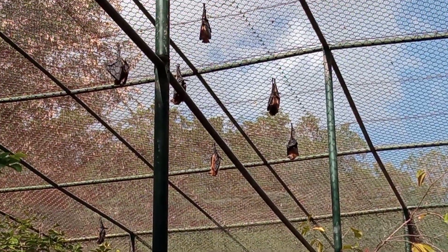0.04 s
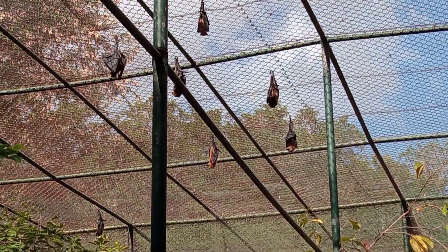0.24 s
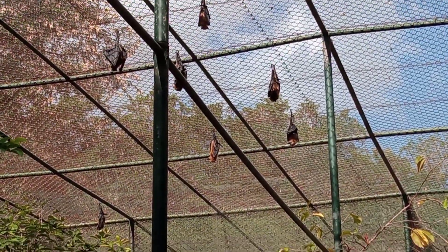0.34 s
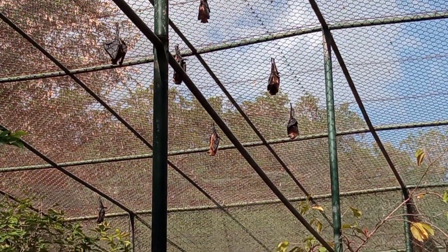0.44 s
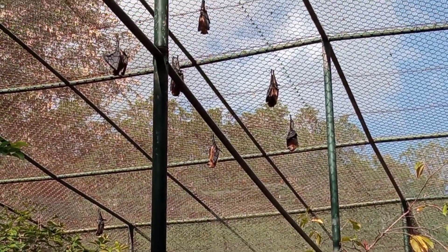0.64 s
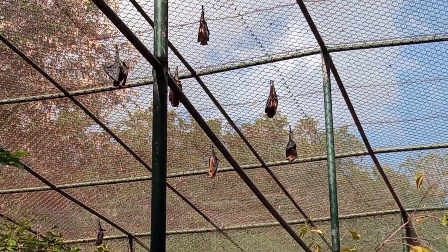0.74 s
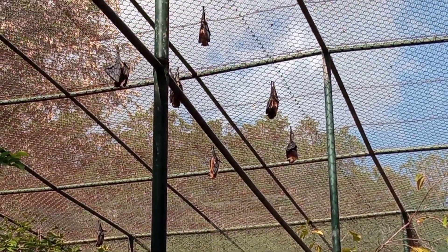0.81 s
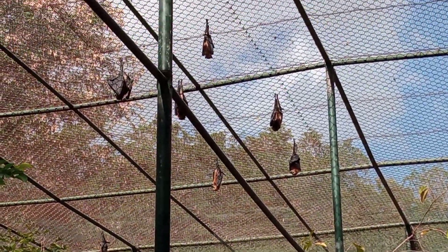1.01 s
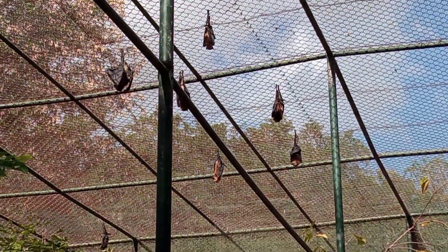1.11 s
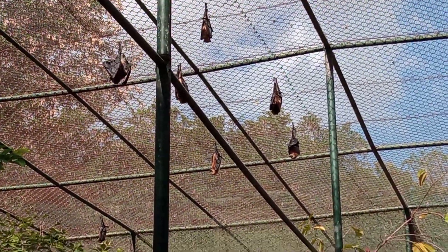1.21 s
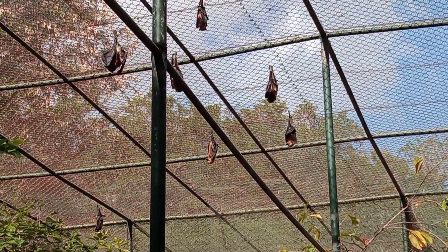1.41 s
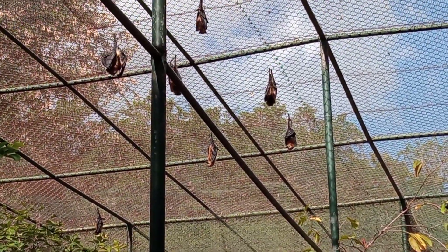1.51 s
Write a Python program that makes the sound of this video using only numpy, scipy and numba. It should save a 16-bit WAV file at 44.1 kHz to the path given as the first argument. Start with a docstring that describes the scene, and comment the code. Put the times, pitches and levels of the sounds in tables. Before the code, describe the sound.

A fruit bat gives one harsh, raspy screech close by, which echoes away in an outdoor enclosure. Another bat squawks softly farther off, while light wind buffets the microphone over a quiet hush.

```python
"""A netted outdoor enclosure, light wind buffeting the microphone over a soft hush with faint low tones.
Close by, a fruit bat screeches once: irregular throat pulses and rasp ring a strong resonance.
Farther off, another bat squawks and thin animal calls glide; the enclosure echoes every call.
One tiny tick sounds near the microphone."""
import sys
import numpy as np
from scipy import signal
from scipy.fft import rfft, irfft, next_fast_len
from scipy.io import wavfile
from scipy.ndimage import uniform_filter1d
from numba import njit

SR = 44100
rng = np.random.default_rng(int(sys.argv[2]) if len(sys.argv) > 2 else 0)


def transcribe(u):
    """Save the signal u as a 16-bit wav file named by the first command-line argument.

    u: samples, shape (n,) or (channels, n), limited to [-1, 1]; the rate is SR.
    q: integer samples, one column per channel.
    """
    v = np.clip(np.atleast_2d(u).T, -1, 1)
    q = np.round(v * 32767).astype(np.int16)
    wavfile.write(sys.argv[1], SR, q)


N = 68355
T = np.arange(N) / SR


def undb(db):
    """Decibels to gain."""
    return 10 ** (np.asarray(db) / 20)


def unit(x):
    """Scale to rms 1."""
    return x / np.sqrt(np.mean(x ** 2))


def colour(x, points):
    """Causal filter through (Hz, dB) points."""
    hz, db = np.array(points).T
    size = 2 * next_fast_len(N)
    f = np.maximum(np.arange(size // 2 + 1) * SR / size, 1)
    cepstrum = irfft(np.log(undb(np.interp(np.log(f), np.log(hz), db))))
    cepstrum[1:size // 2] *= 2
    cepstrum[size // 2 + 1:] = 0
    return irfft(rfft(x, size) * np.exp(rfft(cepstrum)))[:N]


@njit
def resonate(x, hz, width_hz):
    """Band-pass with a moving centre."""
    y, band, low = np.empty(len(x)), 0., 0.
    for i in range(len(x)):
        g, damping = np.tan(np.pi * hz[i] / SR), width_hz / hz[i]
        v = (band + g * (x[i] + 1e-18 - low)) / (1 + g * (g + damping))
        band, low, y[i] = 2 * v - band, low + 2 * g * v, damping * v
    return y


def formant(x, hz, width_hz):
    """A steep resonance: the band-pass twice."""
    hz = hz * np.ones(N)
    return resonate(resonate(x, hz, float(width_hz)), hz, float(width_hz))


def walk(rate_hz):
    """Smooth random drift with rms 1."""
    return unit(np.interp(T * rate_hz, np.arange(N), rng.standard_normal(N)))


def controls(table):
    """A call's gain (silent outside it) and its other columns, per sample."""
    times, db, *columns = np.array(table).T
    gain = undb(np.interp(T, times, db, left=-150, right=-150))
    return [gain] + [np.interp(T, times, column) for column in columns]


# The open air all around. Each row: frequency in Hz, relative level in dB.
HUSH_SPECTRUM = [(30, -0.5), (120, 0), (260, 2.5), (480, 3.5), (620, 3), (800, -4.5), (1100, -10.5),
                 (1600, -6), (2500, -5), (4200, -7), (6000, -18), (7800, -29), (10000, -22), (12000, -48),
                 (16000, -50)]

def hush():
    """Soft outdoor background, almost steady."""
    return undb(-64.5 + .27 * walk(6.46)) * unit(colour(rng.standard_normal(N), HUSH_SPECTRUM))


# Buffets right on the microphone. Each row: peak time in seconds, half-width in seconds, level in dB.
WIND_BUFFETS = [(0.042, .025, -56), (0.252, 0.031, -54.5), (0.345, 0.0074, -58), (0.422, 0.0092, -46),
                (0.505, 0.075, -55), (0.694, 0.024, -55), (0.751, 0.014, -44.5), (0.807, .012, -49),
                (0.868, .03, -49), (1.085, 0.028, -45.5), (1.141, 0.0076, -49), (1.16, 0.01, -39.5),
                (1.252, 0.036, -50.5), (1.325, 0.012, -44.5), (1.43, 0.045, -55.5), (1.484, 0.022, -54.5),
                (1.522, 0.016, -46)]
# The wind's rumble, then its small eddies. Each row: frequency in Hz, relative level in dB.
RUMBLE_SPECTRUM = [(20, -41), (45, -26.5), (70, -7), (110, -2.5), (155, -10), (220, -23), (400, -35.5),
                   (900, -61.5), (4000, -100)]
EDDY_SPECTRUM = [(60, -25), (170, 1), (260, -4.5), (400, -19.5), (900, -48), (4000, -90)]

def wind(breeze_db=-58.5, eddy_db=-9):
    """A low flutter on the microphone swells with each buffet; only buffets stir up the small eddies."""
    gust_power = sum(undb(db) ** 2 * np.exp(-((T - at) / width) ** 2) for at, width, db in WIND_BUFFETS)
    rumble = signal.hilbert(colour(rng.standard_normal(N), RUMBLE_SPECTRUM))
    even_rumble = unit(rumble.real / np.sqrt(uniform_filter1d(abs(rumble) ** 2, size=900)))
    eddies = undb(eddy_db) * unit(colour(rng.standard_normal(N), EDDY_SPECTRUM))
    return np.sqrt(undb(breeze_db) ** 2 + gust_power) * even_rumble + np.sqrt(gust_power) * eddies


# The enclosure's tail. Each row: band centre in Hz, seconds to fade by 60 dB, relative level in dB.
TAIL_BANDS = [(676, 1, 10.5), (1434, 0.79, 3), (2190, 1, 2.5), (2354, 0.9, -2.5), (2600, 0.73, 1),
              (3430, 0.95, 6), (4700, 0.66, -3), (6100, 0.77, 1), (8600, 0.62, 4)]

def enclosure_echoes(calls, first_echo_s=.0055, early_t60_s=.12, early_db=-5.5, tail_db=-6):
    """Quick scatter from the frame and ground, then a longer tail that dulls as it fades."""
    age = np.maximum(T - first_echo_s, 0)
    fade = lambda t60: unit(undb(-60 * age / t60) * (age > 0)) / np.sqrt(N)
    scatter = unit(rng.standard_normal(N) * (rng.random(N) < .02))
    response = undb(early_db) * fade(early_t60_s) * scatter
    spectrum, f = rfft(rng.standard_normal(N)), np.arange(N // 2 + 1) * SR / N
    centres = [row[0] for row in TAIL_BANDS]
    for (_, t60, db), band in zip(TAIL_BANDS, np.eye(len(TAIL_BANDS))):
        response += undb(tail_db + db) * fade(t60) * irfft(spectrum * np.interp(f, centres, band), N)
    return signal.fftconvolve(calls, response)[:N]


# High calls far from the microphone, and two faint low tones in the hush. Each row: start in seconds,
# length in seconds, first, middle and last pitch in Hz, relative level in dB, roughness from 0 to 1.
BACKGROUND_GLIDES = [(-.01, .06, 3560, 3660, 3680, -55, .04), (-.02, .22, 4400, 4250, 3600, -55, 1),
                     (-.02, .17, 5400, 5700, 5500, -64, 1), (.027, .012, 7000, 6400, 5900, -63, .3),
                     (.12, .1, 3550, 3100, 2600, -68, .3), (1.18, .09, 6300, 5900, 5300, -71, .25),
                     (1.39, .15, 4400, 3100, 2800, -69, .6), (.81, .22, 610, 565, 630, -69, .1),
                     (1.225, .10, 4700, 4100, 3400, -66, .12), (1.34, .075, 5850, 5000, 4200, -66, .14),
                     (1.32, .07, 2700, 2450, 2300, -67, .12), (1.22, .19, 790, 800, 780, -72, .08)]

def background_glides(flutter_depth=.1, flutter_hz=1100):
    """Thin high calls and faint low tones glide; their pitch flutters when they are rough."""
    tones = np.zeros(N)
    for start, length, first_hz, middle_hz, last_hz, db, rough in BACKGROUND_GLIDES:
        progress = np.clip((T - start) / length, 0, 1)
        glide_hz = np.interp(progress, [0, .5, 1], [first_hz, middle_hz, last_hz])
        hz = glide_hz * (1 + rough * flutter_depth * walk(flutter_hz))
        swell = np.sqrt(abs(np.sin(np.pi * progress)))
        tones += undb(db) * swell * np.sin(2 * np.pi * np.cumsum(hz) / SR)
    return tones


def tick(start_s=.9466, decay_s=.0002):
    """One tiny bright tick close to the microphone."""
    snap = (T >= start_s) * np.exp(-abs(T - start_s) / decay_s) * rng.standard_normal(N)
    return undb(-34) * formant(snap, hz=10800, width_hz=4800)


def larynx(rate_hz, jitter=.2, shimmer_db=1., rasp_share=.62, puff_decay_cycles=.6):
    """A bat's chaotic closures vary in period and strength; each lets out a fading puff of noise."""
    stretch, strength = rng.standard_normal((1000, 2)).T
    closures = np.append(0, np.cumsum(np.exp(jitter * stretch)))
    cycles = np.interp(np.cumsum(rate_hz * np.ones(N)) / SR, closures, np.arange(len(closures)))
    count = cycles.astype(int)
    clicks = unit(np.diff(count, prepend=0) * 1.)
    puffs = unit(np.exp(-(cycles % 1) / puff_decay_cycles) * rng.standard_normal(N))
    pulses = np.sqrt(1 - rasp_share) * clicks + np.sqrt(rasp_share) * puffs
    return pulses * undb(shimmer_db * np.tanh(strength[count]))


# A bat farther off. Each row: time in seconds, relative level in dB, main resonance in Hz.
FAR_SQUAWK = [(.88, -73, 2045), (.95, -63.5, 1952), (1.02, -61.5, 1707), (1.10, -59, 1710),
              (1.16, -66.5, 1840), (1.21, -85, 1670)]
# Its throat. Each row: frequency in Hz, relative gain in dB.
FAR_THROAT = [(1000, -31), (1500, 12.5), (2100, 9.5), (2900, -4.5), (4200, -2), (5300, -8), (6500, -7),
              (7900, -19), (9900, -17), (12000, -56)]

def far_bat():
    """A lower, softer squawk: pulses ring the throat and one moving resonance."""
    gain, hz = controls(FAR_SQUAWK)
    pulses = larynx(rate_hz=210)
    ring = unit(formant(pulses, hz, width_hz=600))
    throat = undb(10) * unit(colour(pulses, FAR_THROAT))
    return gain * (ring + throat)


# The bat close to the microphone. Each row: time in seconds, level in dB, relative level of the
# other throat resonances in dB, main resonance in Hz, pulses per second, roughness from 0 to 1.
NEAR_SCREECH = [(.225, -46, -12, 2400, 204, 0.21), (.229, -58.5, -2, 2433, 203, 0.1),
                (.231, -39.5, -2.5, 2400, 204.5, 0.21), (.25, -35.5, -6, 2530, 205.4, 0.77),
                (.284, -35, 0.5, 2343, 242, 0.67), (.32, -36.5, 2, 2570, 300, 0.65),
                (.345, -32, -3.5, 2502, 230, 0.76), (.40, -32.5, -1.5, 2544, 220, 0.63),
                (.49, -32.5, 1, 2442, 300, 0.54), (.57, -31.5, -0.5, 2489, 300, 0.71),
                (.645, -31.5, -2.5, 2440, 320, 0.59), (.668, -31, 2, 2382, 390, 0.82),
                (.673, -52, -17, 2280, 450, 0.7)]
# The rest of its throat. Each row: frequency in Hz, relative gain in dB.
NEAR_THROAT = [(600, -58), (1090, -26), (1210, -10.5), (1340, -4.5), (1520, 2), (1680, -16.5),
               (1900, -13.5), (2750, 4.5), (3100, 6.5), (3400, 3.5), (3980, 5.5), (4300, -1.5), (4620, 8),
               (5000, -4.5), (5480, -2.5), (5750, -8.5), (6350, -2), (7100, -18.5), (7550, -15),
               (8200, -32.5), (9900, -25), (11000, -36), (12500, -63.5), (16000, -66)]

def near_bat(flutter_depth=.085, flutter_hz=516.7, swing_limit=2.9, mouth_band_hz=(1233, 11250)):
    """A piercing tone breaks into pulses that ring the main resonance and the weaker ones around it."""
    gain, throat_db, hz, rate_hz, rough = controls(NEAR_SCREECH)
    pulses = larynx(rate_hz)
    phase = 2 * np.pi * np.cumsum(hz * (1 + flutter_depth * rough * walk(flutter_hz))) / SR
    whistle = unit(np.sin(phase) + undb(-9.5) * np.sin(2 * phase))
    ring = unit(formant(pulses, hz, width_hz=612))
    core = np.sqrt(rough) * ring + np.sqrt(1 - rough) * whistle
    core = unit(core / np.hypot(swing_limit, abs(signal.hilbert(core))))  # the throat's swing saturates
    throat = undb(throat_db - 7) * unit(colour(pulses, NEAR_THROAT))
    shutting = np.exp(-((T - .668) / .008) ** 2)  # a bright accent as the mouth shuts
    yelp = undb(-7.5) * shutting * unit(formant(pulses, hz=4380, width_hz=900))
    voice = uniform_filter1d(gain, size=60) * (core + throat + yelp)
    small_mouth = signal.butter(4, mouth_band_hz, "band", fs=SR, output="sos")
    return signal.sosfilt(small_mouth, voice)


def scene():
    """The near bat reaches the microphone mostly directly; the far sounds carry more echo."""
    screech, squawk, glides = near_bat(), far_bat(), background_glides()
    direct = screech + (squawk + glides) / 2
    echoes = enclosure_echoes(screech + undb(-5.5) * squawk + undb(-2.5) * glides)
    return (direct + echoes + wind() + hush() + tick())[None]


def record(dry, low_cut_hz=38, top_hz=15800):
    """The recorder cuts the deepest rumble and the highest treble."""
    trimmed = signal.sosfilt(signal.butter(2, low_cut_hz, "high", fs=SR, output="sos"), dry)
    return signal.sosfilt(signal.ellip(8, .2, 70, top_hz, fs=SR, output="sos"), trimmed)


dry = scene()
out = record(dry)
transcribe(out)
```